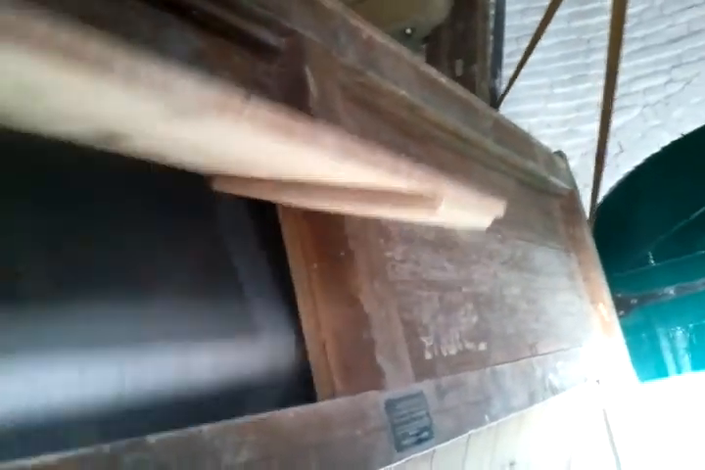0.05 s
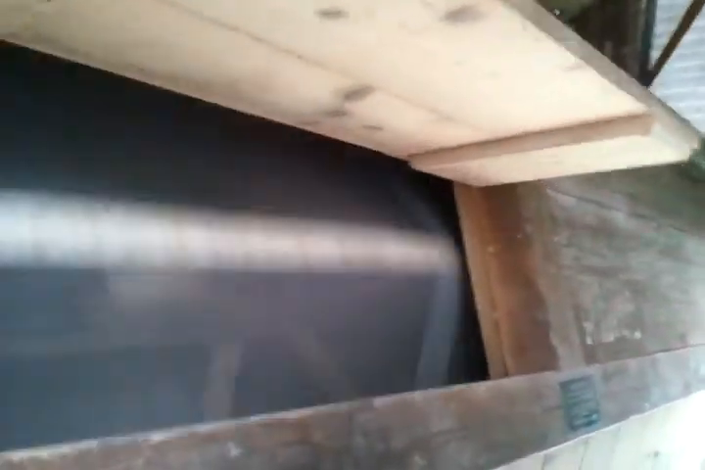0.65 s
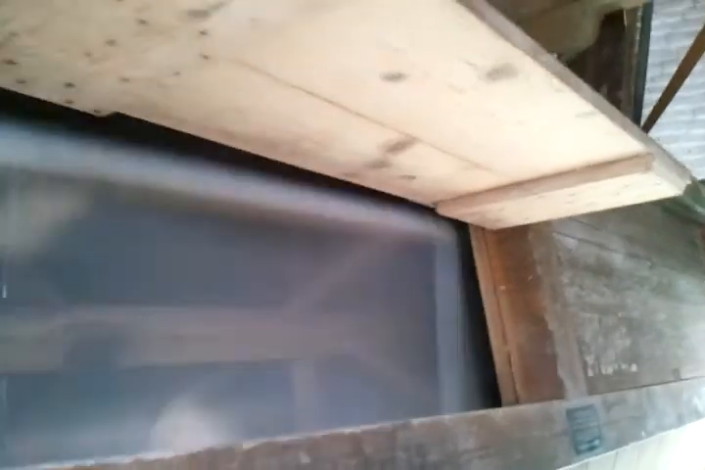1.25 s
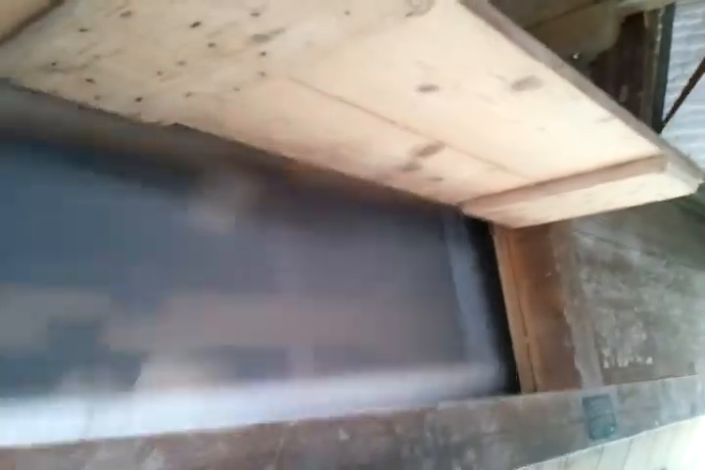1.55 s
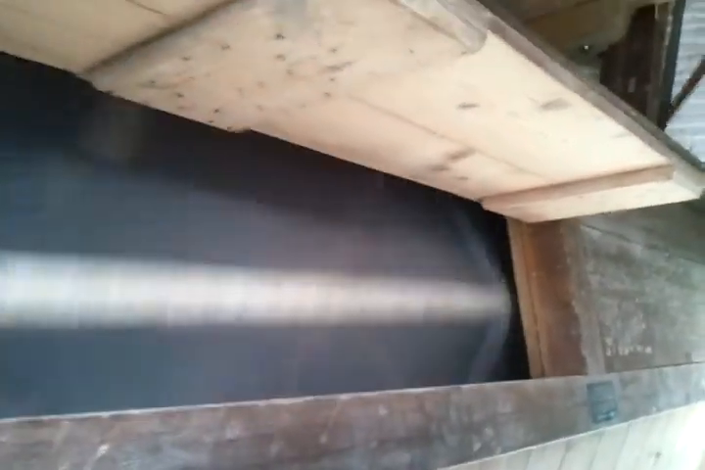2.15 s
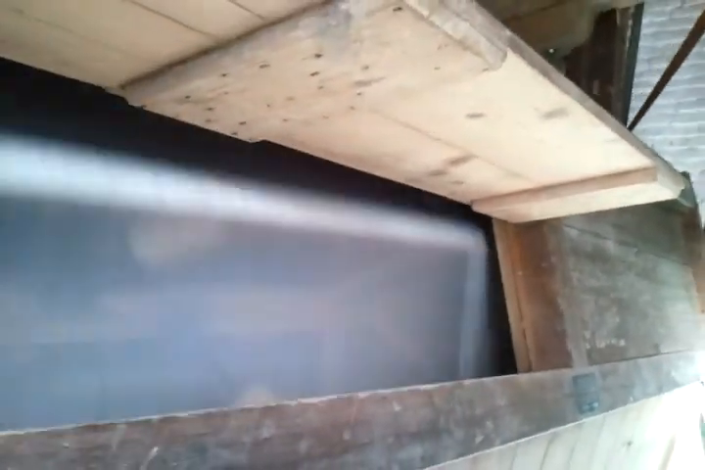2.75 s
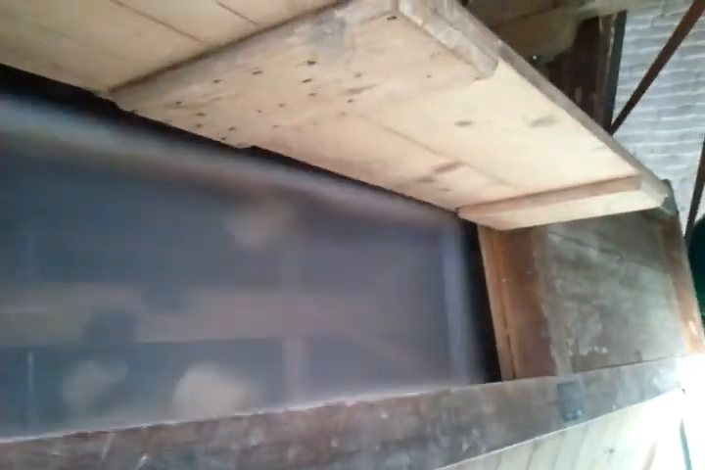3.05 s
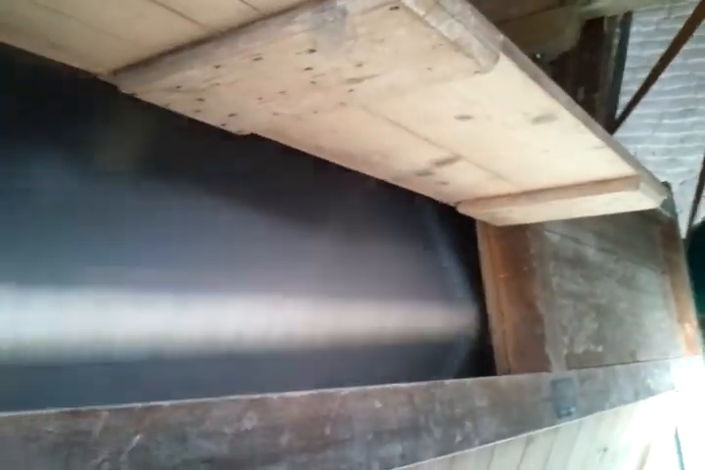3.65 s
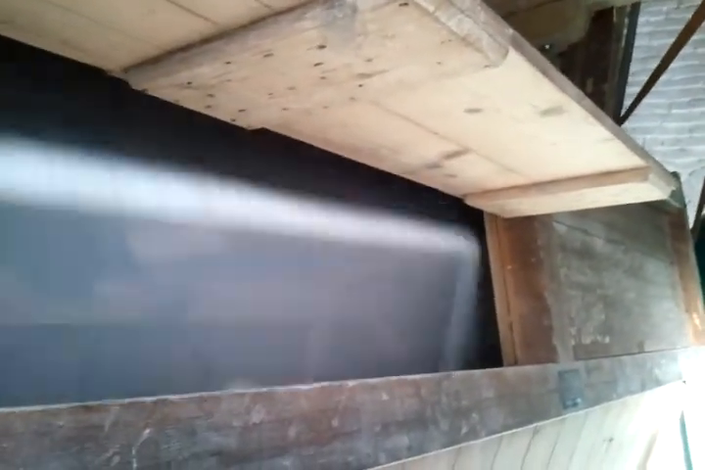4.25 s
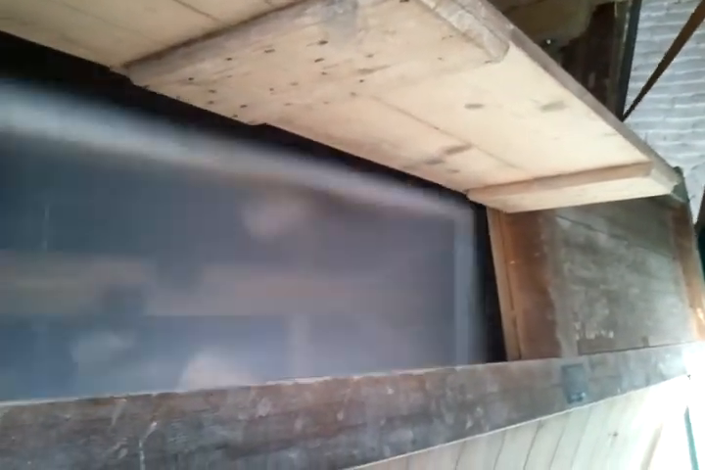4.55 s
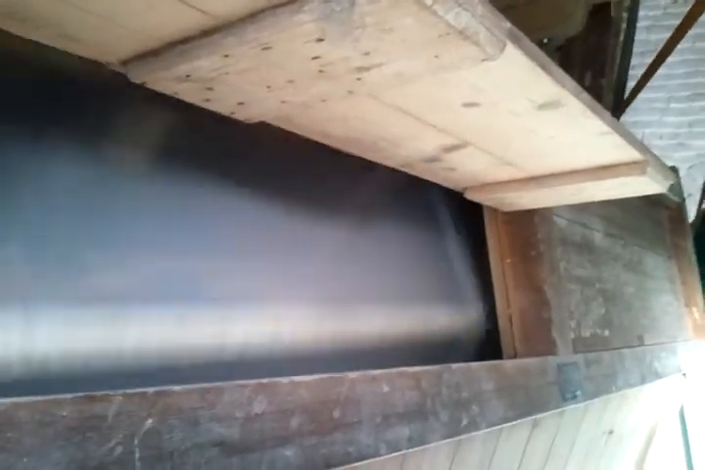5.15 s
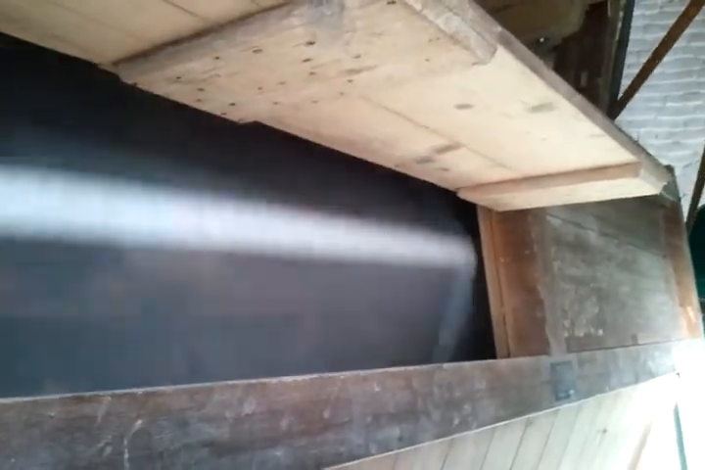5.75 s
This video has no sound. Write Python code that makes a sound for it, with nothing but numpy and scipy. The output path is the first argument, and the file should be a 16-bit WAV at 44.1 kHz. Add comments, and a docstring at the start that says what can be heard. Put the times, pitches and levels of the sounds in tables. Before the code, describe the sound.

Wooden windmill machinery knocks loudly about four times a second, with clattering bounces over a low grinding rumble.

```python
"""Inside a working windmill, in a small wooden room: six cams on a turning shaft strike a wooden part
about four times a second, close up. Each knock is a thud of boards, a few ringing modes and a bright
crack, and many bounce and land twice. Wood ticks and scrapes in between, while gears and stones rumble
through the timber floor. The knocks overload the input before they die away in the room."""
import sys
import numpy as np
from scipy import signal
from scipy.fft import rfft, irfft, next_fast_len
from scipy.io import wavfile
from scipy.ndimage import uniform_filter1d

SR = 44100
rng = np.random.default_rng(int(sys.argv[2]) if len(sys.argv) > 2 else 0)


def store_pcm(level_fs):
    """Save levels as 16-bit WAV."""
    pcm = np.round(np.clip(level_fs, -1, 1) * 32767).astype(np.int16)
    wavfile.write(sys.argv[1], SR, np.atleast_2d(pcm).T)


N = 256220

# steady grind of gears and stones: (frequency [Hz], level [dB])
GRIND_SPECTRUM = [(20, -6), (45, 2.5), (75, -2), (105, -3), (130, 2.5), (152, 1), (200, -7), (300, -1.5),
                  (410, -6.5), (560, -4), (800, -7), (1300, -4.5), (1900, -7.5), (2700, -22), (8000, -37),
                  (13000, -70)]
# wood body, a crowd of overlapping timber resonances: (frequency [Hz], level [dB])
TIMBER_SPECTRUM = [(130, -22), (200, -20.5), (270, -12), (350, -10.5), (410, -15), (500, -8), (650, -6.5),
                   (790, -7), (950, -2.8), (1200, -1), (1750, 0), (2150, -1.8), (2400, -9), (3000, -21),
                   (12000, -58)]
# bright attack of hard wood on wood: (frequency [Hz], level [dB])
CRACK_SPECTRUM = [(1200, -14), (2600, -3), (3200, 0.3), (4000, 1), (5400, -2), (7200, -1.5), (8600, -3.5),
                  (10000, -8), (11500, -14), (15000, -16)]
# modes that sing out above the body: (frequency [Hz], level [dB], t60 [s])
WOOD_MODES = [(529, -26, .46), (585, -26, .33), (636, -21, .25), (735, -24.5, .25), (895, -20, .3),
              (942, -19, .28), (974, -20, .28), (1167, -18, .28), (1214, -20, .33), (1238, -19, .4),
              (1285, -20, .33), (1464, -20, .33), (1695, -18, .28), (1730, -17, .36), (1768, -18, .36),
              (1802, -20.5, .56), (1980, -22, .3), (2042, -21, .33)]
# the six cams of one shaft turn: (floor drone [dB], brush before the knock [dB], first hop [dB])
CAM_LEVELS = [(-33.5, -22, -35), (-34, -38, -33), (-31, -44, -31), (-31, -31, -31), (-32.5, -27, -28),
              (-28.5, -34, -28)]
# light wooden ticks, and brief scrapes just before a knock: (time [s], level [dB])
TICKS_AND_SCRAPES = [(0.0, -22), (.642, -32), (.737, -25), (.859, -25), (1.122, -21), (1.407, -31),
                     (1.525, -28), (2.383, -24), (2.6644, -25), (2.865, -28), (2.9, -29), (3.872, -25),
                     (4.16, -27), (4.1835, -24), (4.218, -30), (4.423, -27), (5.1822, -20.5), (5.615, -22),
                     (5.69, -23), (5.7913, -29)]
# a cam strikes the wood: (time [s], level [dB], pitch the struck spot favours [Hz])
CAM_KNOCKS = [(0.01, -1.8, 1685), (0.207, -2.2, 1467), (0.4345, -4.6, 934), (0.744, -2, 1992),
              (0.987, -11.4, 1708), (1.2066, -1.7, 1182), (1.5392, -3, 1461), (1.7472, -2.1, 2040),
              (1.9905, -5.2, 1779), (2.2555, -2.3, 1696), (2.523, -3.6, 974), (2.739, -1.4, 1236),
              (3.0665, -3, 1212), (3.2464, 0.6, 1216), (3.487, -2.3, 1768), (3.771, -1.9, 1966),
              (4.041, -1.4, 1729), (4.272, -1.2, 528), (4.559, -1.2, 1704), (4.788, -1.2, 1710),
              (5.0065, -2.6, 1769), (5.291, -1.8, 1168), (5.5367, -0.5, 896)]
# the wood lands again after a bounce: (time [s], level [dB], pitch the struck spot favours [Hz])
BOUNCE_LANDINGS = [(0.4828, -2.4, 739), (1.011, -3.5, 943), (1.057, -2.1, 1765), (2.0365, -2.8, 895),
                   (2.288, -4.7, 1165), (2.565, -2.6, 1279), (3.272, -4.8, 1732), (3.5435, -4.6, 635),
                   (3.789, -6.1, 1762), (4.598, -5.7, 530), (4.812, -9.2, 1216), (5.037, -4.2, 894)]

# envelope shapes: (rise [s], wood t60 [s], room send [dB], room t60 [s])
TICK_BODY_SHAPE, TICK_TOP_SHAPE = (.003, .16, -13, .45), (.002, .12, -14, .35)
THUD_SHAPE, WOOD_SHAPE = (.016, .38, -11.5, .8), (.0028, .31, -13.6, .64)
SNAP_SHAPE, TAIL_SHAPE = (.0004, .06, -40, .1), (.0008, .215, -12, .44)
# tone of each kind of contact: (thud [dB], wood [dB], crack [dB])
SQUARE_HIT, GLANCING_HIT, LANDING = (.9, .1, -3.6), (-3.2, -3.6, -4.9), (1.2, -.2, -4.4)
# a lower-pitched spot is hollower: (thud [dB/octave], wood [dB/octave], crack [dB/octave])
HOLLOW_TILT = (.9, -.7, -.5)
CROSSOVER_HZ = 800   # thud below, wood above


def from_db(db):
    """Decibels to gain."""
    return 10 ** (np.asarray(db) / 20)


def coloured(spectrum):
    """Noise with the given spectral shape, rms 1."""
    size = next_fast_len(N)
    hz, level_db = np.transpose(spectrum)
    log_hz = np.log(np.maximum(np.fft.rfftfreq(size, 1 / SR), 1))
    gain = from_db(np.interp(log_hz, np.log(hz), level_db))
    noise = irfft(rfft(rng.standard_normal(size)) * gain, size)[:N]
    return noise / np.sqrt(np.mean(noise ** 2) + 1e-20)


def resonate(x, hz, width_hz):
    """One resonance; white noise keeps its rms through it."""
    r = np.exp(-np.pi * width_hz / SR)
    feedforward = np.sqrt((1 - r * r) / 2) * np.array([1, 0, -1])
    feedback = [1, -2 * r * np.cos(2 * np.pi * hz / SR), r * r]
    return signal.lfilter(feedforward, feedback, x + 1e-18)


def flicker(per_s, depth_db):
    """A gain that wanders at random about 1."""
    knots = rng.standard_normal(N // 8)
    return from_db(depth_db * np.interp(np.arange(N) / SR * per_s, np.arange(len(knots)), knots))


def ringing(times, level_db, shape):
    """Envelope of a row of hits: energy spreads through the wood, dies there and lingers in the room."""
    rise_s, wood_t60, room_db, room_t60 = shape
    age = np.arange(SR) / SR
    attack = 1 - np.exp(-age / rise_s)
    wood = from_db(-60 * age / wood_t60)
    room = from_db(room_db - 60 * age / room_t60)
    energy = attack ** 2 * (wood ** 2 + room ** 2)
    total = np.zeros(N + SR)
    for s, db in zip(times, level_db):
        start = int(np.clip(s * SR, 0, N))
        total[start:start + SR] += from_db(db) ** 2 * energy
    return np.sqrt(total[:N])


def off_walls(x, cutoff_hz=11000):
    """Wooden walls swallow the highest treble of all that they reflect."""
    return signal.sosfilt(signal.butter(16, cutoff_hz, fs=SR, output="sos"), x)


def gear_grind(level_db=-29.3):
    """The bed: gears and stones grind on with a rough, low rumble."""
    return from_db(level_db) * coloured(GRIND_SPECTRUM) * flicker(per_s=25, depth_db=1.2)


def floor_drone(hz=101.5, slack_db=-43, rise_s=.06, hold_s=.08):
    """The floor hums under load: slack at each knock, swelling as the next cam takes up the strain."""
    hum = resonate(rng.standard_normal(N), hz, width_hz=11)
    hum = resonate(hum, hz, width_hz=50)
    hum /= np.sqrt(uniform_filter1d(hum ** 2, SR // 10) + 1e-12)   # levelled, so the load sets the swell
    corners = []
    for k, (s, _, _) in enumerate(CAM_KNOCKS):
        loaded_db, _, _ = CAM_LEVELS[k % len(CAM_LEVELS)]
        corners += [(s, slack_db), (s + rise_s, loaded_db), (s + rise_s + hold_s, loaded_db)]
    load_db = np.interp(np.arange(N) / SR, *np.transpose(sorted(corners)))
    return hum * from_db(load_db)


def touches(hops=2, drop_s=.118, hop_s=.05, jitter_s=.01, hop_loss_db=2.5, scatter_db=1.5):
    """Ticks, scrapes, cam brushes and hops of shaken wood: (time [s], body [dB], crack [dB])."""
    rows = [(s, db - 2.5, db) for s, db in TICKS_AND_SCRAPES]   # light on body
    for k, (s, _, _) in enumerate(CAM_KNOCKS):
        _, brush_db, first_hop_db = CAM_LEVELS[k % len(CAM_LEVELS)]
        rows.append((s - .006, brush_db, brush_db))   # the cam's edge brushes just before it hits
        for hop in range(hops):
            late, louder = rng.standard_normal(2)
            land_s = s + drop_s + hop_s * hop + jitter_s * late
            db = first_hop_db - hop_loss_db * hop + scatter_db * louder
            rows.append((land_s, db + 2, db))   # hops are fuller
    return rows


def light_clatter(crack_db=1.0):
    """Light contacts around the knocks: each touch has a short woody body and a grainy top."""
    times, body_db, top_db = np.transpose(touches())
    body = coloured(TIMBER_SPECTRUM) * ringing(times, body_db, TICK_BODY_SHAPE)
    top = off_walls(coloured(CRACK_SPECTRUM)) * ringing(times, top_db + crack_db, TICK_TOP_SHAPE)
    return body + top * flicker(per_s=500, depth_db=1.6)


def blows(bounce_within_s=.1, neutral_hz=1350):
    """Knocks and landings: (time [s], thud [dB], wood [dB], crack [dB], favoured pitch [Hz])."""
    landing_times = np.array(BOUNCE_LANDINGS)[:, 0]
    contacts = [(*row, LANDING) for row in BOUNCE_LANDINGS]
    for s, db, hz in CAM_KNOCKS:   # a knock that bounces only glances, so it sounds thinner
        bounces = np.any((landing_times > s) & (landing_times < s + bounce_within_s))
        contacts.append((s, db, hz, GLANCING_HIT if bounces else SQUARE_HIT))
    rows = []
    for s, db, hz, tone_db in contacts:
        hollow_db = np.log2(neutral_hz / hz) * np.array(HOLLOW_TILT)
        rows.append((s, *(db + np.array(tone_db) + hollow_db), hz))
    return rows


def timber_body(thud_trim_db=-2.0, wood_trim_db=-1.9):
    """The weight of each blow: the boards ring densely, and their low end swells later and lasts longer."""
    times, thud_db, wood_db, _, _ = np.transpose(blows())
    lowpass = signal.butter(4, CROSSOVER_HZ, "low", fs=SR, output="sos")
    highpass = signal.butter(4, CROSSOVER_HZ, "high", fs=SR, output="sos")
    thud = signal.sosfilt(lowpass, coloured(TIMBER_SPECTRUM))
    wood = signal.sosfilt(highpass, coloured(TIMBER_SPECTRUM))
    thud *= ringing(times, thud_db + thud_trim_db, THUD_SHAPE)
    wood *= ringing(times, wood_db + wood_trim_db, WOOD_SHAPE)
    return thud + wood


def struck_modes(trim_db=1.9, favour_db=9.8, favour_width_hz=22, scatter_db=3.5, rise_s=.005):
    """The pitch of each blow: all modes ring, with a boost for those that the struck spot favours."""
    hz, mode_db, t60 = np.transpose(WOOD_MODES)
    age = np.arange(int(.6 * SR)) / SR
    envelopes = (1 - np.exp(-age / rise_s)) * from_db(-60 * age / t60[:, None])
    rings = envelopes * np.exp(2j * np.pi * hz[:, None] * age)
    out = np.zeros(N + len(age))
    for s, thud_db, wood_db, _, spot_hz in blows():
        favoured = np.exp(-.5 * ((hz - spot_hz) / favour_width_hz) ** 2)
        chance_db = scatter_db * (1 - favoured) * rng.standard_normal(len(hz))
        blow_db = np.where(hz < CROSSOVER_HZ, thud_db, wood_db)
        gains = from_db(blow_db + trim_db + mode_db + favour_db * favoured + chance_db)
        phases = np.exp(2j * np.pi * rng.random(len(hz)))
        start = int(np.clip(s * SR, 0, N))
        out[start:start + len(age)] += ((gains * phases) @ rings).real
    return out[:N]


def cracks(snap_db=2.2, tail_db=.2):
    """The edge of each blow: a bright snap, whose treble scatters off the walls in a grainy tail."""
    times, _, _, crack_db, _ = np.transpose(blows())
    tail = ringing(times, crack_db + tail_db, TAIL_SHAPE) * flicker(per_s=450, depth_db=1.1)
    snap = ringing(times, crack_db + snap_db, SNAP_SHAPE)
    return coloured(CRACK_SPECTRUM) * snap + off_walls(coloured(CRACK_SPECTRUM)) * tail


def scene():
    """Mono mix: three knock layers up front, clatter and rumble behind."""
    knocks = timber_body() + struck_modes() + cracks()
    return (knocks + light_clatter() + gear_grind() + floor_drone())[None]


def record(dry, ceiling=.70, hardness=10.0, treble_hz=10000, treble_db=-1.4, cutoff_hz=15200):
    """The overloaded input flattens the knock peaks; the top octave is softened, then cut."""
    clipped = dry / (1 + np.abs(dry / ceiling) ** hardness) ** (1 / hardness)
    dull = signal.filtfilt(*signal.butter(2, treble_hz, fs=SR), clipped)
    softened = dull + from_db(treble_db) * (clipped - dull)
    high_cut = signal.firwin(255, cutoff_hz, window="blackman", fs=SR)
    return signal.fftconvolve(softened, high_cut[None], "same")


dry = scene()
out = record(dry)
store_pcm(out)
```